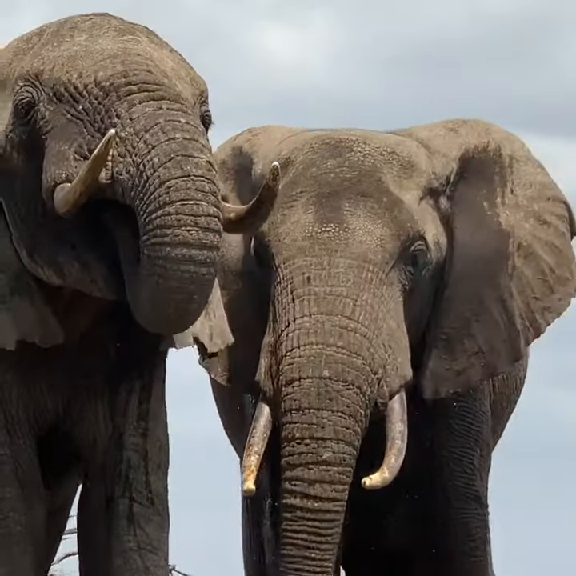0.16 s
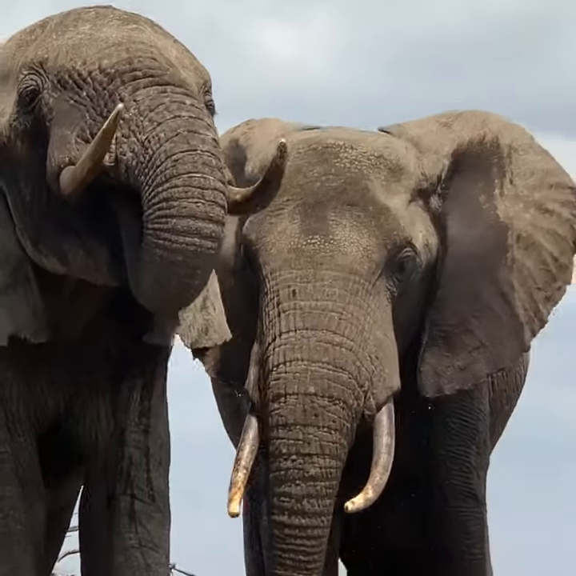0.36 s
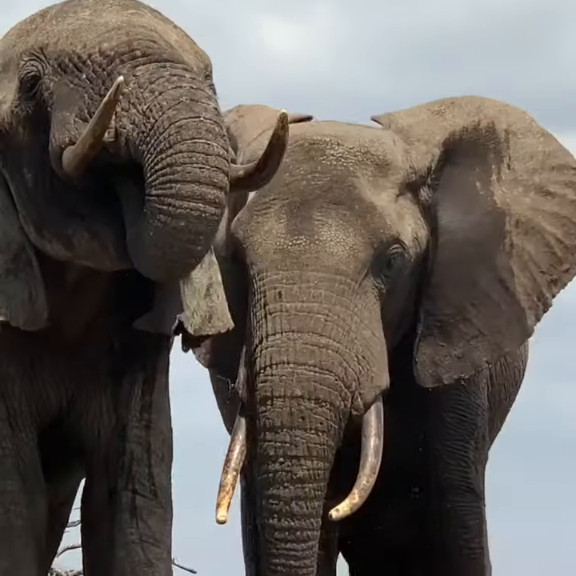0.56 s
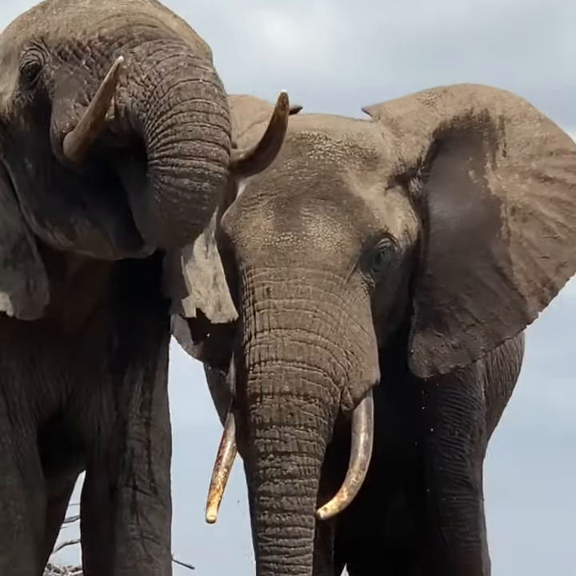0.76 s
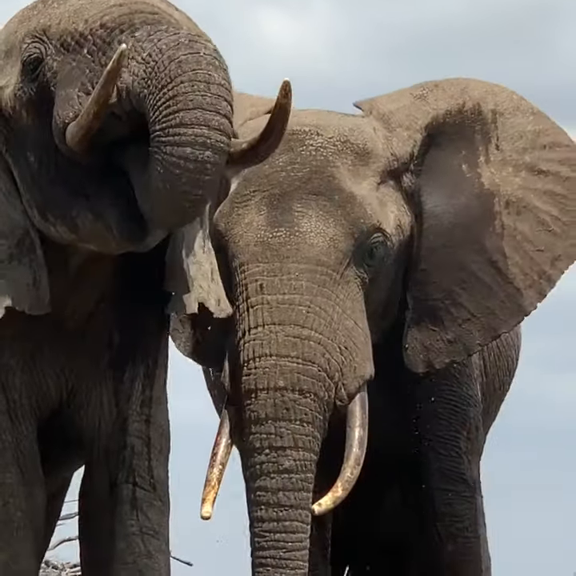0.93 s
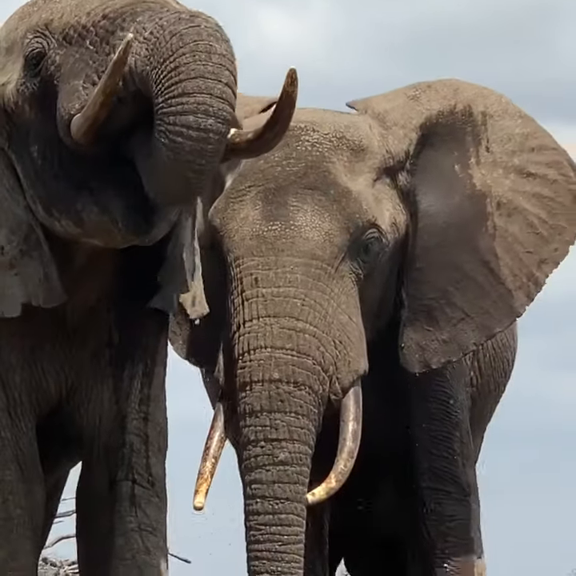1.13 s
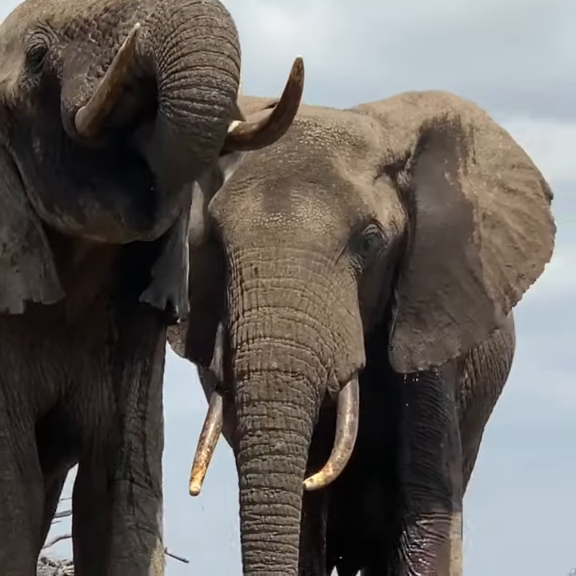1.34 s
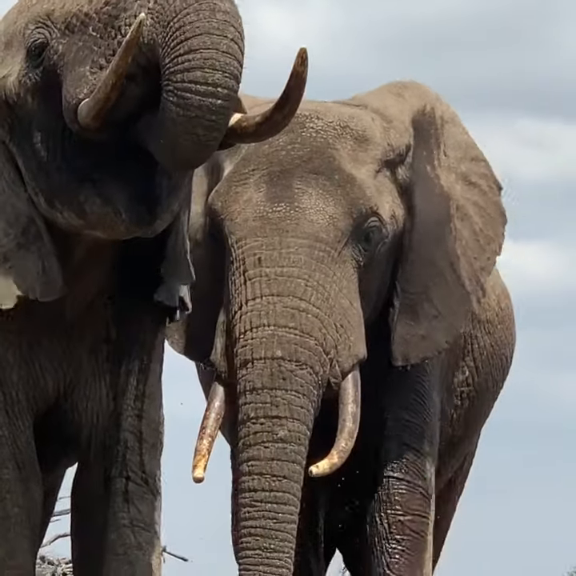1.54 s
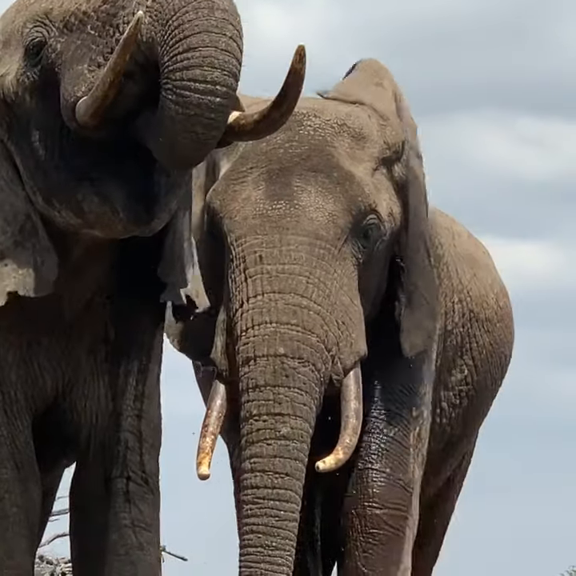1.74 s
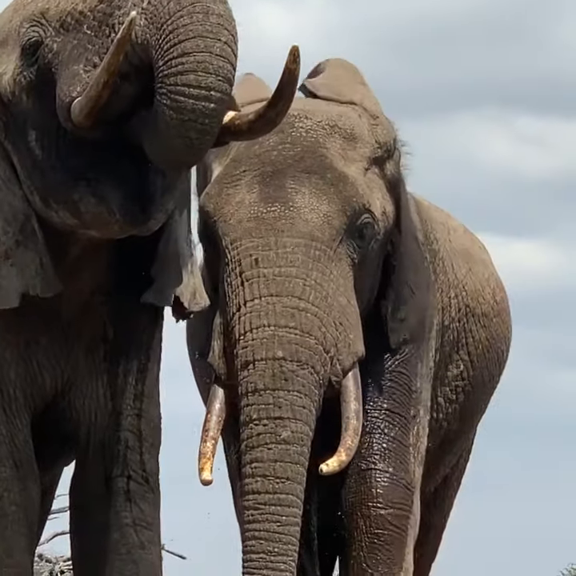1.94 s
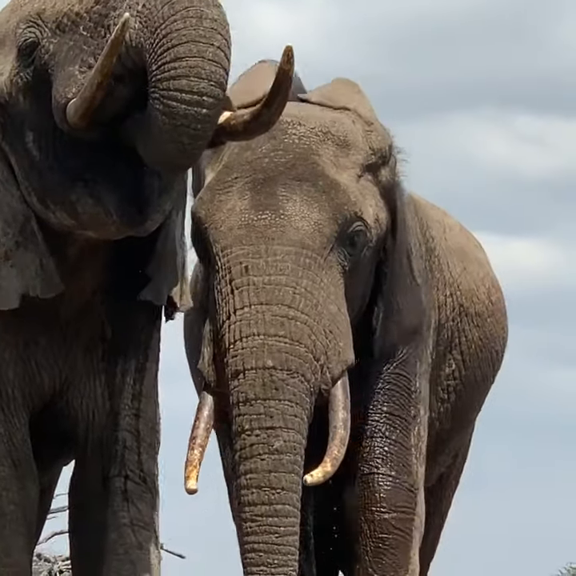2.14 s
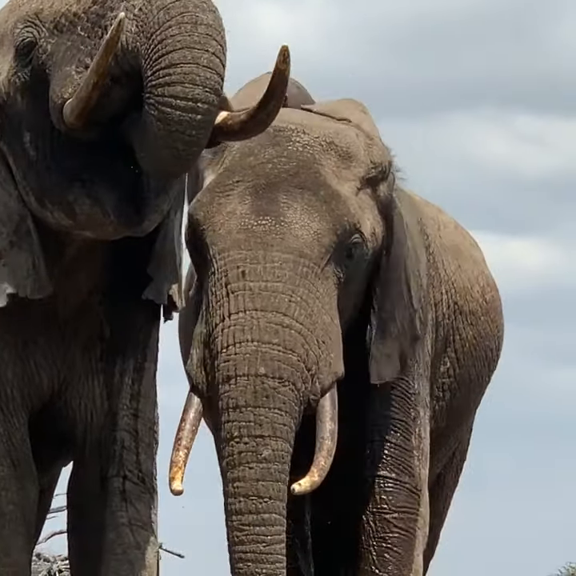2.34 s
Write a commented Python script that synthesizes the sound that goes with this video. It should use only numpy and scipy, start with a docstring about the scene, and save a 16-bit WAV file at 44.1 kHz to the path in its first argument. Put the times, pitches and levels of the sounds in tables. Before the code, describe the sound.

An elephant drinks outdoors, heard dry and close in stereo. From 0 to 0.5 s water spatters and rushes with bright ticks, bubbles and tiny squeaks. Low hollow gulps grow around 0.6-0.8 s, with a faint moan near 0.9-1.2 s. The strongest deep gulps cluster at 1.4-1.65 s, with splashes and a wet breathy hiss to 1.8 s, then fading gulps, sparse drips and soft wind rumble.

```python
"""In the open, elephants drink; one pours water from its trunk down its throat. Two microphone ports.
The gulps swell a hollow throat tone near 155 Hz; glugs, drips and ticks are short dying tones.
Air and water rush as flickering noise and ringing drops through the trunk; spills are spray and bubbles.
Wet breath whistles in tube resonances, a moan and squeaks are sines, wind rumbles on the ports.
Distance is a matter of level alone: no echo, no travel time."""
import sys
import numpy as np
from scipy import signal
from scipy.fft import rfft, irfft
from scipy.io import wavfile

SR = 44100
rng = np.random.default_rng(int(sys.argv[2]) if len(sys.argv) > 2 else 0)


def gain_from_db(level_db):
    """Convert decibel levels to linear amplitude factors (20 dB per decade)."""
    decades = np.asarray(level_db, float) / 20
    return 10 ** decades


def to_wav(s):
    """Save 16-bit WAV."""
    ch = np.atleast_2d(s).T  # columns
    pcm = np.round(np.clip(ch, -1, 1) * 32767)  # PCM
    wavfile.write(sys.argv[1], SR, pcm.astype(np.int16))


N = 105840   # samples, 2.4 s

# wind rumble on the ports: t/s, level/dB
WIND_LEVEL = [(0.0, -70), (0.15, -75), (0.17, -69), (0.59, -62), (0.62, -52.5), (0.99, -61.5), (1.03, -51),
              (1.08, -61), (1.29, -53.5), (1.32, -62), (1.85, -54), (1.9, -66.5), (2.05, -55.5),
              (2.21, -67), (2.27, -57.5), (2.4, -68)]
# wind spectrum: f/Hz, relative level per Hz/dB
WIND_COLOUR = [(8.8, -62.5), (15, -10.5), (38, -7.5), (103, -10.5), (130, -20), (170, -20.5), (290, -120)]
# rush of water and air, middle band: t/s, level before trim/dB
RUSH_LEVEL = [(0.0, -73.5), (0.05, -52.5), (0.08, -63.5), (0.17, -61.5), (0.18, -58), (0.21, -60.5),
              (0.25, -51), (0.29, -63.5), (0.31, -49), (0.34, -57), (0.63, -58.5), (0.65, -53), (0.69, -61),
              (0.78, -57), (0.81, -67), (0.89, -60.5), (0.93, -63), (1.2, -62), (1.38, -65), (1.42, -59),
              (1.45, -62), (1.55, -58.5), (1.63, -59), (1.67, -51.5), (1.74, -52.5), (1.79, -58),
              (2.05, -62.5), (2.4, -66.5)]
# rush, the two bands above: t/s, treble level before trim/dB, top level/dB
HISS_LEVEL = [(0.0, -79.5, -77.5), (0.02, -70, -81.5), (0.05, -58, -59.5), (0.1, -69, -75.5),
              (0.21, -69.5, -75), (0.24, -69.5, -78), (0.26, -64.5, -69.5), (0.29, -71.5, -77),
              (0.31, -65, -65.5), (0.45, -74.5, -74), (0.48, -70.5, -82), (0.57, -75, -65.5),
              (0.59, -79, -77.5), (0.62, -68.5, -65.5), (0.71, -75, -77.5), (0.78, -67.5, -70),
              (0.82, -72, -75.5), (0.96, -70.5, -69), (0.97, -55.5, -76.5), (1.0, -71.5, -72),
              (1.1, -71.5, -75.5), (1.33, -71.5, -77.5), (1.42, -61.5, -63), (1.5, -68, -79.5),
              (1.58, -71.5, -70.5), (1.61, -71.5, -76.5), (1.66, -63, -55), (1.7, -58, -61.5),
              (1.74, -61.5, -54), (1.78, -67.5, -69.5), (2.27, -70, -71.5), (2.4, -75, -78.5)]
# spectra of the three bands of the rush: f/Hz, relative level per Hz/dB
RUSH_MIDDLE = [(350, -28), (600, -8.5), (707, -2.5), (786, 0), (926, -6), (1090, 4.5), (1190, 3),
               (1620, -1.5), (1780, -1.5), (2060, 1.5), (2470, -14.5), (2700, -30.5), (3510, -54),
               (5940, -120)]
RUSH_TREBLE = [(1470, -36.5), (2500, -8), (3200, -7), (3750, -2), (3850, -7), (4320, -9), (4710, -10.5),
               (4900, -24), (6370, -25.5), (10800, -120)]
RUSH_TOP = [(3120, -38), (5300, -2), (5590, -6), (6260, 1), (7160, -1), (8420, -5), (8870, -5.5),
            (9300, 7.5), (12100, -58), (20500, -120)]
# trunk resonances that lift the middle of the rush: f/Hz, width/Hz, lift/dB
TRUNK = [(802, 43, 2), (1110, 130, 1), (2360, 460, 4)]
# drops against the rush: t/s, relative level/dB
WETNESS = [(0, 1), (.4, -2.5), (1.0, 0.5), (1.4, 1), (1.75, -1.5), (1.9, -3.5), (2.4, -13)]
# breath whistling in the trunk: t/s, then level/dB of each of the four tube resonances, before its share
WHISTLE_LEVEL = [(0.0, -85, -105, -69, -88), (0.05, -79, -62, -73, -55.5), (0.09, -70, -70, -66, -66),
                 (0.17, -59.5, -74, -75, -59.5), (0.3, -86, -55, -56, -64.5), (0.41, -63, -71, -73, -69),
                 (0.56, -72, -77, -72.5, -65.5), (0.9, -61.5, -81, -80, -57.5), (0.93, -68, -76, -72, -69),
                 (1.2, -87, -71, -75, -69), (1.37, -80, -72, -69, -86), (1.42, -59, -67, -63, -64),
                 (1.44, -66.5, -72, -71, -68), (1.59, -57, -58, -60, -72), (1.68, -69.5, -65, -59, -59),
                 (1.7, -63, -70, -81, -75), (1.79, -64, -70, -66, -74), (2.4, -82, -88, -69.5, -81)]
# tube resonances of the breath: f/Hz, overall width/Hz (about), share/dB
TUBE = [(802, 52, -3.5), (1124, 110, -5.5), (1600, 57, -6.5), (2080, 200, -3)]
# broad upper resonance of the breath: t/s, level before its share/dB
UPPER_TUBE_LEVEL = [(0, -87), (0.049, -72), (.1, -80), (.17, -86), (.19, -58), (.21, -79), (.3, -77),
                    (.315, -64), (.34, -71), (.45, -106), (.62, -77), (.77, -66), (.85, -89), (.97, -68),
                    (1.06, -94), (1.39, -83), (1.42, -68), (1.6, -89), (1.66, -62.5), (1.7, -67),
                    (1.75, -55.5), (1.79, -77), (1.95, -83), (2.15, -69.5), (2.4, -93)]
# turbulence humming in the throat: t/s, level before its share/dB
THROAT_HUM = [(0, -85), (.22, -70.5), (.4, -67.5), (.75, -59.5), (1.0, -66), (1.25, -62.5), (1.36, -71),
              (1.40, -55.5), (1.6, -49.5), (1.7, -54.5), (1.86, -68), (2.1, -64), (2.4, -69)]
# turbulence elsewhere: t/s, mouth, broad upper body, lowest trunk resonance (levels before share/dB)
HUM_LEVEL = [(0.0, -92, -84, -93), (0.06, -76, -77, -57.5), (0.16, -78, -78, -92),
             (0.23, -79.5, -80, -70.5), (0.39, -62.5, -59, -68.5), (0.47, -67.5, -85, -66.5),
             (0.51, -59, -57, -62), (0.57, -67, -60.5, -67), (0.62, -74, -58.5, -68),
             (0.68, -65.5, -71.5, -75), (0.78, -58, -66, -65), (0.81, -51.5, -71, -78),
             (0.84, -75, -64, -72), (0.89, -63, -64, -67), (1.12, -63, -63.5, -75.5),
             (1.18, -64.5, -67.5, -78.5), (1.36, -68.5, -70, -82), (1.39, -61.5, -83, -73),
             (1.42, -50.5, -66, -68), (1.46, -63, -72, -62.5), (1.51, -65, -77, -67), (1.57, -59, -56, -63),
             (1.91, -73, -80, -84), (2.04, -64.5, -83, -94), (2.24, -75.5, -83, -84.5),
             (2.4, -96, -74, -80)]
# throat and the three cavities above: f/Hz, overall width/Hz (about), share/dB
CAVITIES = [(156, 40, 2), (247.2, 74, -1.5), (323, 94, -4), (565, 102, -1.5)]
# narrow hiss: t/s, level before its share/dB
AIRY_LEVEL = [(0.0, -108), (0.03, -90), (0.12, -99), (1.37, -79.5), (1.38, -77), (1.59, -73), (1.71, -64.5),
              (1.94, -71), (1.99, -66), (2.4, -75)]
# sharp ticks of drops landing: t/s, starting level/dB, f/Hz
TICKS = [(0.0238, -45, 4650), (0.0438, -42, 1120), (0.1805, -42, 1140), (0.2399, -55, 1920),
         (0.3047, -47, 2160), (0.4758, -50, 1090), (0.5287, -57, 2020), (0.7264, -55, 2090),
         (0.9692, -57.5, 2180), (1.476, -52, 1030)]
# splashes of spilled water: t/s, level before trims/dB, bubble f/Hz, spray's time to fall 25 dB/s,
# spray's treble over its middle/dB
SPLASHES = [(0.025, -45, 4330, 0.006, 7), (0.045, -46.5, 1056, 0.013, -9), (0.109, -56, 1020, 0.02, -23),
            (0.177, -49, 1020, 0.065, -36), (0.218, -50, 1080, 0.074, -3.5),
            (0.241, -40.5, 2080, 0.038, -17), (0.255, -39, 1020, 0.013, -25),
            (0.304, -45.5, 1570, 0.023, -15), (0.315, -55, 1520, 0.079, -33),
            (0.376, -44.5, 940, 0.071, -15), (0.441, -47, 780, 0.05, -15), (0.476, -47, 604, 0.027, -5),
            (0.644, -62, 2024, 0.043, -14), (0.724, -48.5, 802, 0.1, -20), (0.772, -41, 2070, 0.017, 1.5),
            (0.878, -44, 2090, 0.013, -24), (0.903, -49.5, 788, 0.024, -22), (0.97, -55, 2280, 0.013, -17),
            (1.107, -61, 1580, 0.04, 15.5), (1.18, -44.5, 2020, 0.046, -4), (1.225, -49, 1209, 0.01, -34),
            (1.281, -49.5, 2120, 0.11, -11), (1.407, -41.5, 1473, 0.14, -31),
            (1.477, -45, 1011, 0.013, -20), (1.508, -57, 780, 0.06, 4), (1.538, -41.5, 780, 0.061, -26),
            (1.574, -47.5, 804, 0.032, 5), (1.662, -48, 1150, 0.025, -15.5),
            (1.716, -54, 1110, 0.027, -19.5)]
# small drips ringing clear of the rush: t/s, peak level/dB, f/Hz, ring time/s
DRIPS = [(.11, -55, 1017, 0.014), (.128, -62, 2160, 0.012), (.18, -53.5, 1080, 0.011),
         (.182, -61, 1940, .012), (.2, -55.5, 2174, 0.01), (.256, -66.5, 1080, 0.021),
         (.312, -53, 2250, 0.01), (.53, -49, 2058, 0.0094), (.772, -57, 2080, .007),
         (.97, -59, 2210, 0.0053), (1.411, -62, 1516, 0.014), (1.42, -56.5, 1089, 0.0092),
         (1.476, -55.5, 1037, 0.011), (1.541, -59, 791.6, .014), (1.586, -57, 770, 0.0089),
         (1.61, -53, 797, 0.0093), (1.642, -58.5, 2005, 0.022), (1.662, -52.5, 1126, 0.013),
         (1.695, -57.5, 2110, 0.01585), (1.715, -50.5, 1113, 0.011), (1.735, -58, 1407, 0.024),
         (1.73, -59, 3090, 0.0094), (1.815, -60, 2150, 0.0092), (1.96, -62.5, 1567, 0.023),
         (2.02, -62, 1600, 0.015), (2.07, -62.5, 1077, 0.012)]
# gulps in the throat cavity: t/s, peak level/dB, f/Hz, ring time/s
GULPS = [(0.161, -66, 153.5, 0.026), (0.253, -55, 144.9, 0.065), (0.407, -51.5, 143.7, 0.044),
         (0.485, -50, 144, 0.028), (0.634, -45.5, 161.4, 0.029), (0.725, -44, 149.9, 0.035),
         (0.758, -62, 141.6, 0.05), (0.811, -51, 156, 0.035), (0.85, -53.5, 153, 0.027),
         (0.909, -50.5, 150.5, 0.04), (1.017, -49, 162.5, 0.033), (1.057, -55, 150, 0.039),
         (1.108, -60, 136.8, 0.042), (1.187, -51.5, 145.3, 0.031), (1.388, -40.5, 156, 0.0093),
         (1.426, -39.5, 154.1, 0.034), (1.483, -35, 156, 0.03), (1.52, -40, 156, 0.0084),
         (1.556, -51, 153.8, 0.022), (1.586, -35.5, 159.7, 0.018), (1.644, -39, 146.1, 0.018),
         (1.746, -47, 162.8, 0.029), (1.796, -47, 158.2, 0.019), (1.868, -55.5, 154.8, 0.053),
         (1.92, -57.5, 150, 0.049), (1.988, -59, 150.6, 0.022), (2.099, -56.5, 148.3, 0.062),
         (2.275, -68.5, 146.6, 0.085)]
# squeaks sliding down: t/s, peak level/dB, from f/Hz, to f/Hz, length/s
SQUEAKS = [(0.185, -57, 3420, 2500, 0.0123), (0.317, -53, 3380, 2600, 0.0096)]
# knocks of the smaller mouth cavity: t/s, peak level/dB, f/Hz, ring time/s
GLUGS = [(0.368, -62.5, 335, 0.029), (0.497, -51, 273, 0.019), (0.58, -63, 281.2, 0.12),
         (0.635, -61.5, 220, 0.025), (0.798, -56.5, 251, 0.029), (1.242, -63.5, 257.8, 0.014),
         (1.392, -44.5, 235, 0.013), (1.41, -48, 215.7, 0.0065), (1.471, -58.5, 320, 0.012),
         (1.566, -53, 251, 0.024), (1.653, -56.5, 325.3, 0.017), (2.019, -58.5, 261, 0.012),
         (2.307, -68.5, 305, 0.05)]
# faint held tone of the narrow mouth: t/s, f/Hz, level/dB
MOAN = [(.84, 241.5, -90.5), (.89, 239.4, -59.5), (.97, 244.6, -60.5), (1.03, 249.5, -62.5),
        (1.10, 254.5, -58.5), (1.16, 254, -64.5), (1.21, 247, -97)]
# lead of the left port: f/Hz, phase/rad
PORT_PHASE = [(0, 0), (1700, 0), (2070, .3), (2330, .5), (2700, 2.5), (3100, 3.0), (3450, 3.5), (3800, 5.4),
              (4150, 6.1), (4500, 6.35), (4850, 6.5), (5200, 8.4), (5500, 9.1), (5850, 8.6), (6200, 7.3),
              (6900, 6.9), (7600, 6.28), (8300, 5.7), (8950, 4.6), (9300, 3.6)]
# left port over right: f/Hz, level/dB
PORT_BALANCE = [(30, -.5), (70, -1), (155, -3), (260, -.3), (1700, 0), (2100, -1), (2800, 0), (3750, 2.5),
                (4100, 0), (4800, -.5), (5200, -3), (6200, -6), (7000, -.5), (7400, 0)]
# likeness of the ports: f/Hz, share common to both
LIKENESS = [(30, .96), (150, .97), (300, .82), (700, .72), (1700, .82), (2400, .75), (2750, .65),
            (3200, .75), (3600, .6), (4100, .97), (4500, .995), (4850, .95), (5100, .85), (5500, .94),
            (6200, .7), (7500, .97), (8000, .99), (8500, .8), (9300, .7)]

DROPS_PER_S, DROPS_DB, DROP_SPREAD_DB = 500, -2, 3.6   # usual rate; drops before wetness; mean excess
DROP_Q = 57.52   # f over width of a drop's ring
RASP_DB, RASP_HZ = 3, 45   # flutter of the wet breath: spread, corner of its drift
AIRY_HZ, AIRY_WIDTH_HZ, AIRY_SHARE_DB = 5320, 650, -1.5
UPPER_HZ, UPPER_WIDTH_HZ, UPPER_SHARE_DB = 2864, 400, 4
TICK_WIDTH_HZ = 1900
SPRAY_DB, SPRAY_RISE_S = -22, 0.005
BUBBLE_DB, BUBBLE_CYCLES = 0.5, 9.7   # cycles in which a bubble falls 27.5 dB
LEAD_S, BEND = .004, .015   # swells start this early; bend of the pitch
CUTOFF_HZ = 9900   # 40 dB down from here up


def rms_one(x):
    """Scale to rms 1."""
    return x / np.sqrt(np.mean(x ** 2) + 1e-20)


def in_time(rows):
    """Columns of a curve, one value per sample."""
    s, *columns = np.transpose(rows)
    return [np.interp(np.arange(N) / SR, s, c) for c in columns]


def at_hz(points, hz):
    """Read a table on a log-frequency axis."""
    p = np.array(points)
    return np.interp(np.log(np.maximum(hz, 1)), np.log(np.maximum(p[:, 0], 1)), p[:, 1])


def drift(rate):
    """Slow chance, spread 1: noise at SR / 40 through two low-pass poles at rate/Hz."""
    r = np.exp(-80 * np.pi * rate / SR)
    noise = rng.standard_normal(N // 40 + 2002)
    slow = signal.lfilter([1], [1, -2 * r, r * r], noise)[2000:]
    return np.interp(np.arange(N) / 40, np.arange(len(slow)), rms_one(slow - slow.mean()))


def resonance(x, hz, width_hz):
    """Two-pole peak, gain 1 on top."""
    r = np.exp(-np.pi * width_hz / SR)
    poles = [1, -2 * r * np.cos(2 * np.pi * hz / SR), r * r]
    return signal.lfilter([(1 - r * r) / 2, 0, (r * r - 1) / 2], poles, x + 1e-18)


def coloured(x, spectrum):
    """Give x a spectrum; rms 1."""
    hz = np.arange(N // 2 + 1) * SR / N
    return rms_one(irfft(rfft(x) * gain_from_db(at_hz(spectrum, hz)), N))


def flickering(spectrum, count, patchy_db, rate):
    """Noise in overlapping log-spaced bands that each flicker, partly together; common and diffuse rows."""
    hz = np.arange(N // 2 + 1) * SR / N
    noise = rfft(rng.standard_normal((2, N))) * gain_from_db(at_hz(spectrum, hz))
    low, high = spectrum[0][0], spectrum[-1][0]
    place = np.log(np.maximum(hz, 1) / low) / np.log(high / low) * (count - 1)
    together = drift(rate * 0.59)
    out = np.zeros((2, N))
    for k in range(count):
        band = irfft(noise * np.clip(1 - abs(place - k), 0, 1), N)
        out += band * gain_from_db(patchy_db * (3.5 * together + drift(rate)))
    return rms_one(out)


def swell_shape(t, ring):
    """Cavity envelope: rises to 1 at half the ring time, then dies."""
    u = t / (max(ring, .005) / 2)
    return u * np.exp(1 - u)


def ringing_tones(rows):
    """Each event swells and dies as one tone whose pitch bends slightly up or down."""
    out, t = np.zeros(N + SR), np.arange(SR // 2) / SR
    chances = rng.uniform(-0.77, 1, (len(rows), 2))
    for (s, db, hz, ring), (turn, bend) in zip(rows, chances):
        i = max(int((s - LEAD_S) * SR), 0)
        bent_time = t + BEND * bend * t * t / ring
        tone = np.sin(2 * np.pi * hz * bent_time + np.pi * turn)
        out[i:i + len(t)] += gain_from_db(db) * swell_shape(t, ring) * tone
    return out[:N]


def wind():
    """Rumble on the microphone ports: low noise in three flickering bands."""
    level_db, = in_time(WIND_LEVEL)
    return gain_from_db(level_db) * flickering(WIND_COLOUR, count=3, patchy_db=.35, rate=10)


def drops():
    """Small drops at random times, each ringing at one of 24 pitches, the high ones weaker."""
    excess_db = DROP_SPREAD_DB * np.minimum(rng.exponential(1, N), 3)
    sizes = gain_from_db(excess_db) * rng.choice([-1, 1], N)
    born = rng.random(N) < DROPS_PER_S * gain_from_db(4 * drift(9)) / SR
    dealt = rng.integers(0, 24, N)
    out = np.zeros(N)
    for k, hz in enumerate(np.geomspace(450, 8000, 24)):
        out += resonance(sizes * born * (dealt == k), hz, hz / DROP_Q) * np.sqrt(1000 / hz)
    return out


def rush(spray):
    """Water and air: noise grainy with drops, its middle lifted by trunk resonances; spray swells it."""
    (middle_db,), (treble_db, top_db) = in_time(RUSH_LEVEL), in_time(HISS_LEVEL)
    grains, (wet_db,) = drops(), in_time(WETNESS)
    middle = flickering(RUSH_MIDDLE, count=10, patchy_db=0.06, rate=36)
    treble = flickering(RUSH_TREBLE, count=6, patchy_db=0.04, rate=20)
    top = flickering(RUSH_TOP, count=8, patchy_db=.7, rate=25)
    middle[0] += gain_from_db(DROPS_DB + wet_db) * coloured(grains, RUSH_MIDDLE)
    treble[0] += gain_from_db(DROPS_DB + wet_db - 0.5) * coloured(grains, RUSH_TREBLE)
    middle = middle + sum((gain_from_db(db) - 1) * resonance(middle, hz, w) for hz, w, db in TRUNK)
    middle_gain = gain_from_db(middle_db - 4.5 + 1.3 * drift(RASP_HZ)) + spray[0]
    treble_gain = gain_from_db(treble_db + 0.5 + 0.94 * drift(RASP_HZ)) + spray[1]
    top_gain = gain_from_db(top_db) + 1.37 * spray[1]
    return middle_gain * rms_one(middle) + treble_gain * treble + top_gain * top


def whistle():
    """Wet breath: fluttering noise twice through each tube resonance; common and diffuse rows."""
    breath = rng.standard_normal((2, N)) * gain_from_db(RASP_DB * drift(RASP_HZ))
    levels = in_time(WHISTLE_LEVEL) + in_time(UPPER_TUBE_LEVEL)
    shapes = TUBE + [(UPPER_HZ, UPPER_WIDTH_HZ, UPPER_SHARE_DB)]
    out = np.zeros((2, N))
    for db, (hz, w, share_db) in zip(levels, shapes):
        once = resonance(breath, hz, w * 1.6)   # two wider passes narrow to about w
        out += gain_from_db(db + share_db) * rms_one(resonance(once, hz, w * 1.6))
    return out


def hum():
    """Turbulence ringing twice through each cavity, and a narrow hiss; common and diffuse rows."""
    levels = in_time(THROAT_HUM) + in_time(HUM_LEVEL) + in_time(AIRY_LEVEL)
    shapes = CAVITIES + [(AIRY_HZ, AIRY_WIDTH_HZ, AIRY_SHARE_DB)]
    out = np.zeros((2, N))
    for db, (hz, w, share_db) in zip(levels, shapes):
        once = resonance(rng.standard_normal((2, N)), hz, w * 1.5)
        out += gain_from_db(db + share_db) * rms_one(resonance(once, hz, w * 1.5))
    return out


def ticks():
    """Drops landing: each a sine that dies within a few cycles."""
    out, t = np.zeros(N + SR), np.arange(SR // 50) / SR
    for s, db, hz in TICKS:
        i = int(s * SR)
        out[i:i + len(t)] += gain_from_db(db) * np.exp(-np.pi * TICK_WIDTH_HZ * t) * np.sin(2 * np.pi * hz * t)
    return out[:N]


def splashes():
    """Spilled water: spray envelopes (middle and treble) for the rush, and bubbles rising in pitch."""
    spray, bubbles, t = np.zeros((2, N + SR)), np.zeros(N + SR), np.arange(SR // 2) / SR
    for s, db, hz, decay, bright_db in SPLASHES:
        i = int(s * SR)
        burst = gain_from_db(db + SPRAY_DB - 25 * t / decay) * (1 - np.exp(-t / SPRAY_RISE_S))
        spray[:, i:i + len(t)] += burst * gain_from_db([[0], [bright_db]])
        life = t * hz / BUBBLE_CYCLES
        swell = gain_from_db(db + BUBBLE_DB - 27.5 * life) * (1 - np.exp(-12 * life))
        bubbles[i:i + len(t)] += swell * np.sin(2 * np.pi * hz * t * (1 + 0.05 * life))
    return spray[:, :N], bubbles[:N]


def drips():
    """Small drips, each a short ringing tone."""
    return ringing_tones(DRIPS)


def throat():
    """The gulps swell one cavity tone whose pitch glides from gulp to gulp."""
    swell, t = np.zeros(N + SR), np.arange(SR // 2) / SR
    for s, db, hz, ring in GULPS:
        i = int((s - LEAD_S) * SR)
        swell[i:i + len(t)] += gain_from_db(db) * swell_shape(t, ring)
    hz, = in_time([(s + ring / 2, hz) for s, db, hz, ring in GULPS])
    cycles = np.cumsum(hz + 3.12 * drift(8.4)) / SR + rng.random()
    return swell[:N] * np.sin(2 * np.pi * cycles)


def squeaks():
    """Short whistles: sines that fall in pitch under a half-sine swell."""
    out = np.zeros(N)
    for s, db, from_hz, to_hz, length in SQUEAKS:
        u = np.arange(int(length * SR)) / (length * SR)
        cycles = length * (from_hz * u + (to_hz - from_hz) * u * u / 2)
        i = int(s * SR)
        out[i:i + len(u)] += gain_from_db(db) * np.sin(np.pi * u) * np.sin(2 * np.pi * cycles)
    return out


def glugs():
    """Knocks of the smaller mouth cavity, each a short ringing tone."""
    return ringing_tones(GLUGS)


def moan():
    """Held tone of the narrow mouth: one sine, wavering in pitch and level."""
    hz, db = in_time(MOAN)
    cycles = np.cumsum(hz + 0.77 * drift(9.8)) / SR
    return np.sqrt(2) * gain_from_db(db + 0.35 * drift(6.5)) * np.sin(2 * np.pi * cycles)


def ports(common, diffuse):
    """Two microphone ports: phase lead and balance by frequency; the diffuse sound arrives opposed."""
    hz, sides = np.arange(N // 2 + 1) * SR / N, np.array([[1], [-1]])
    p = np.array(PORT_PHASE)
    lead = np.exp(.5j * np.interp(hz, p[:, 0], p[:, 1]) * sides)
    turn = lead * gain_from_db(at_hz(PORT_BALANCE, hz) / 2 * sides)
    alike = np.clip(at_hz(LIKENESS, hz), 0, 1)
    shared = np.sqrt((1 + alike) / 2) * rfft(common)
    opposed = np.sqrt((1 - alike) / 2) * rfft(diffuse) * sides
    return irfft(turn * (shared + opposed), N)


def scene():
    """Throat, water and wind meet at the ports; the squeaks join alike on both sides."""
    spray, bubbles = splashes()
    around = wind() + rush(spray) + whistle() + hum()
    around[0] += ticks() + bubbles + drips() + throat() + glugs() + moan()
    return ports(*around) + squeaks()


def roll_off(x):
    """The treble ends steeply here."""
    return signal.sosfilt(signal.butter(12, 9450, fs=SR, output="sos"), x)


def record(dry):
    """A steep low-pass takes off the top of the microphone signal."""
    low_pass = signal.cheby2(10, 40, CUTOFF_HZ, fs=SR, output="sos")
    mix = signal.sosfilt(low_pass, dry)
    return roll_off(mix)


dry = scene()
out = record(dry)
to_wav(out)
```